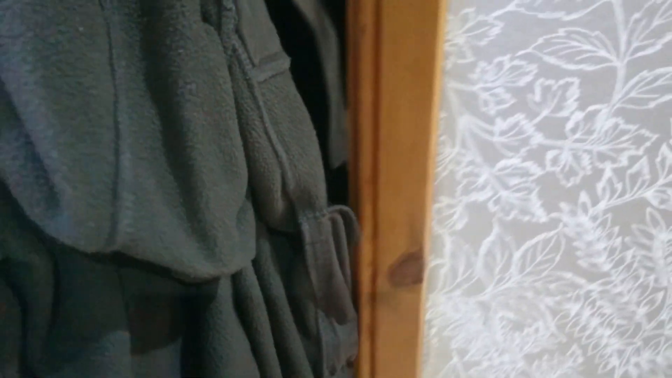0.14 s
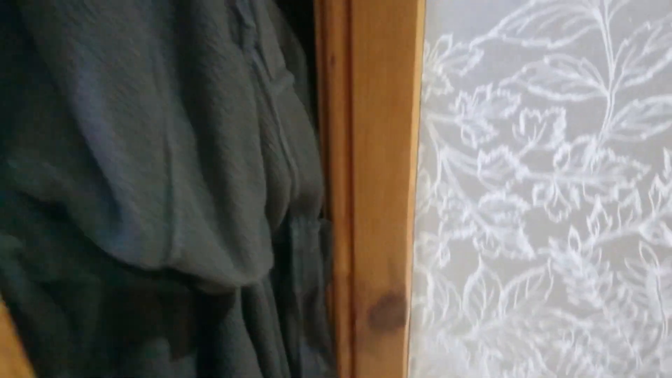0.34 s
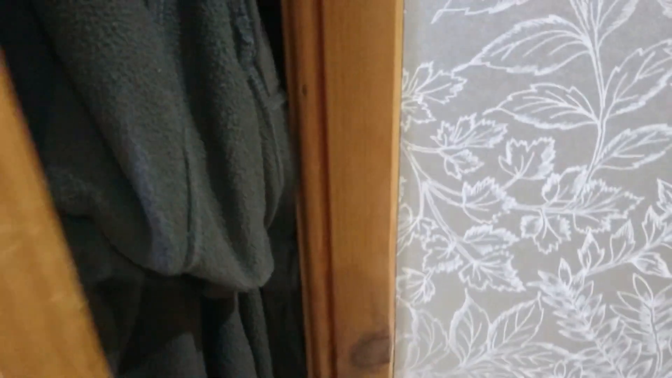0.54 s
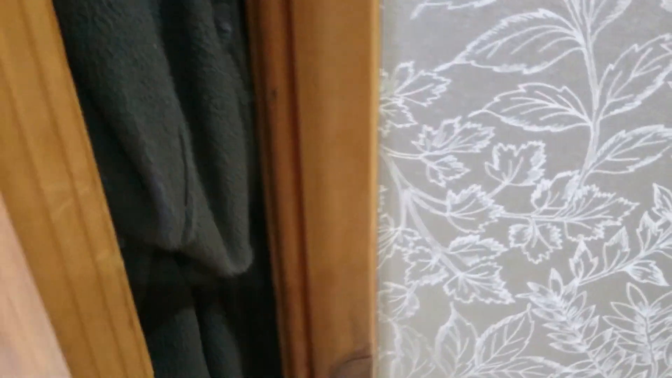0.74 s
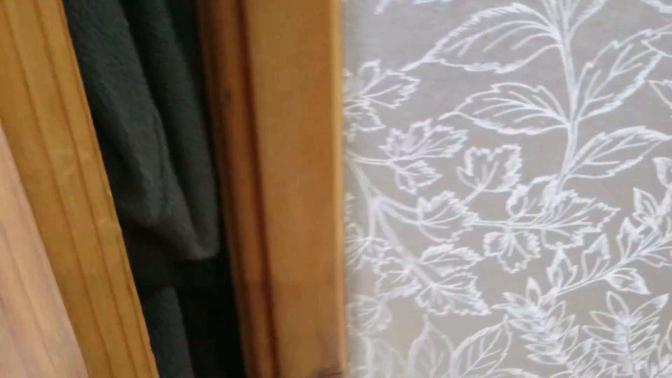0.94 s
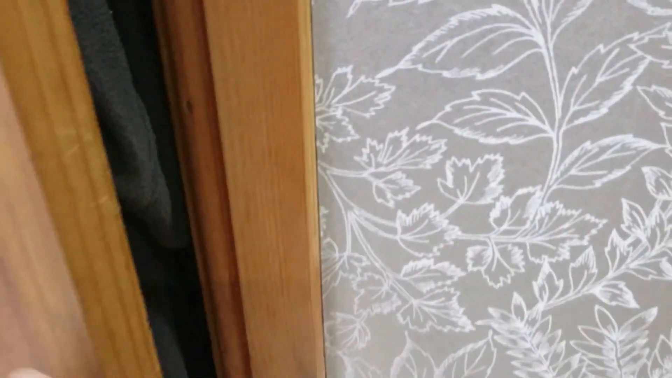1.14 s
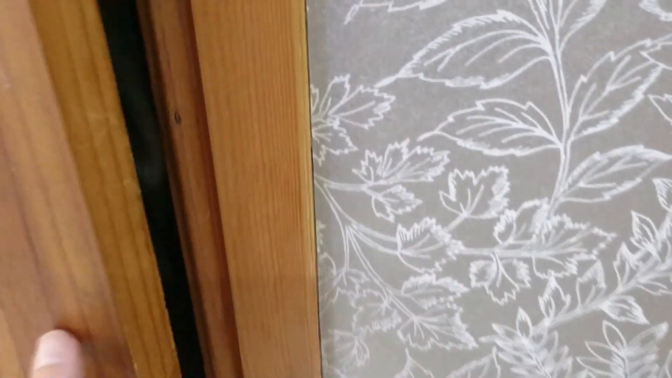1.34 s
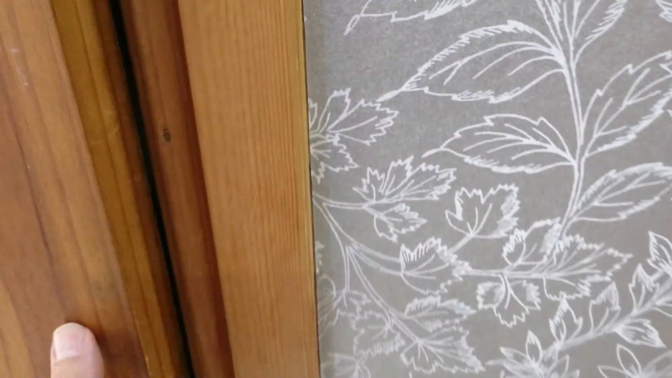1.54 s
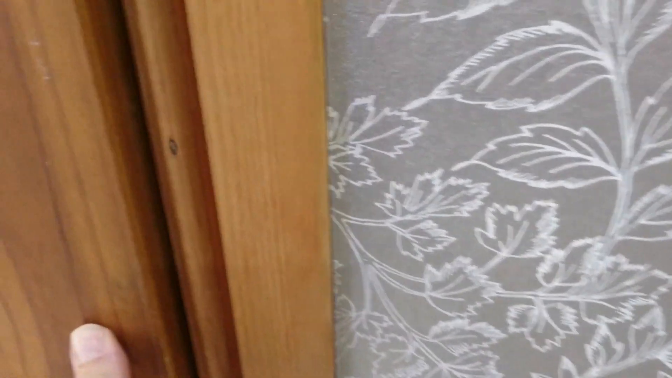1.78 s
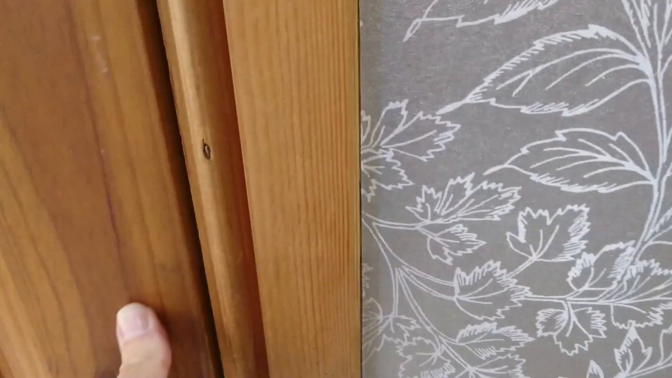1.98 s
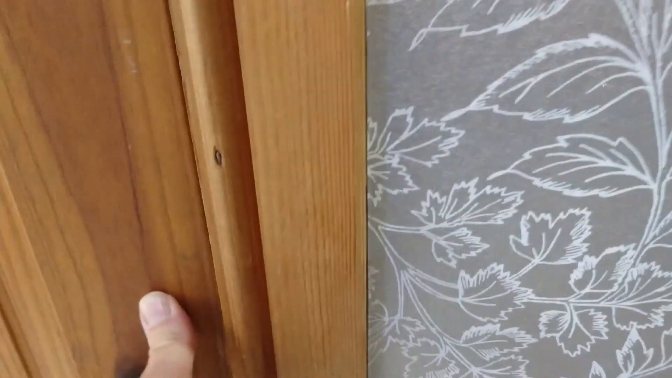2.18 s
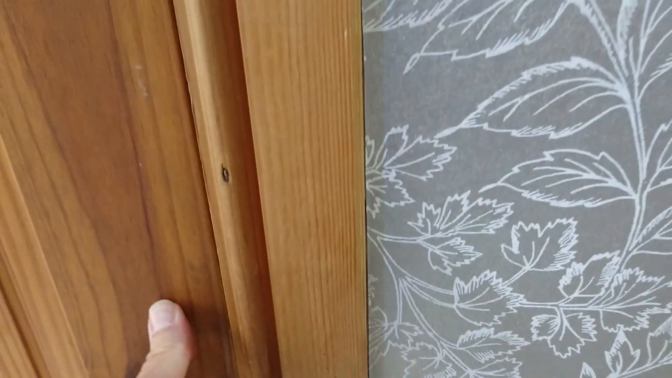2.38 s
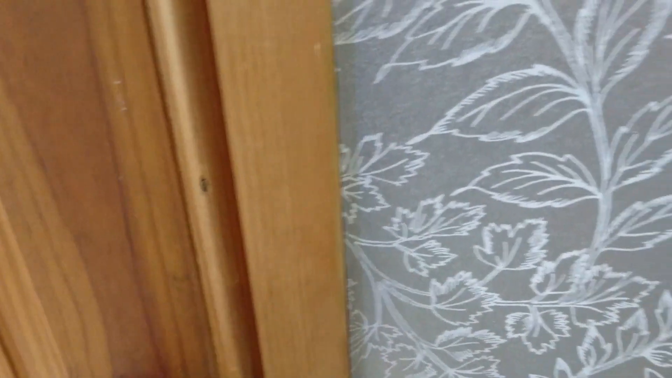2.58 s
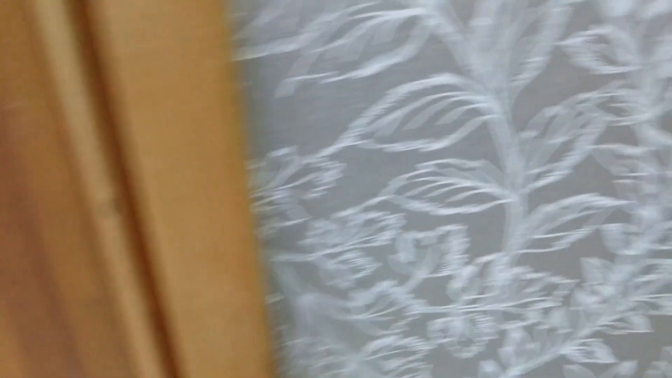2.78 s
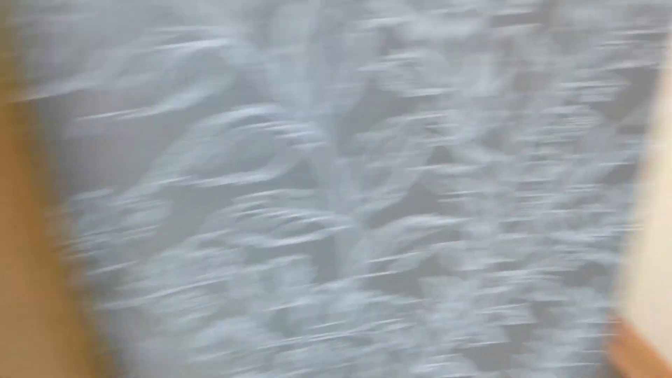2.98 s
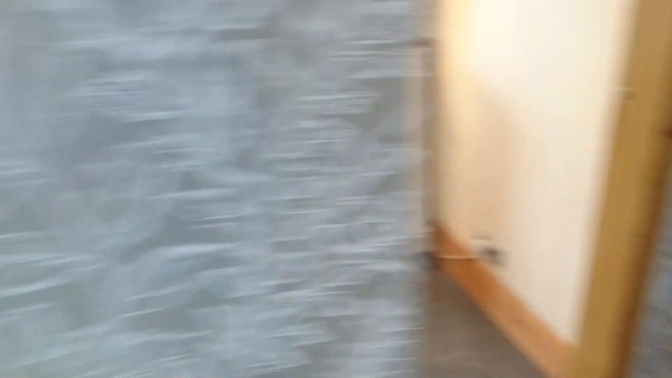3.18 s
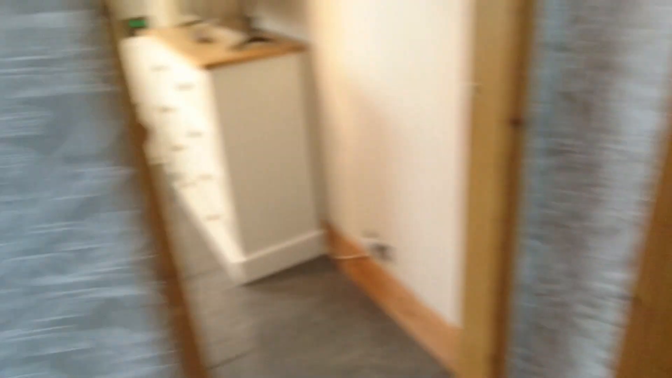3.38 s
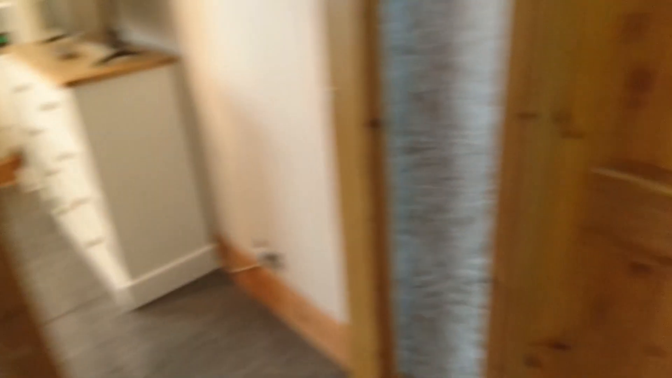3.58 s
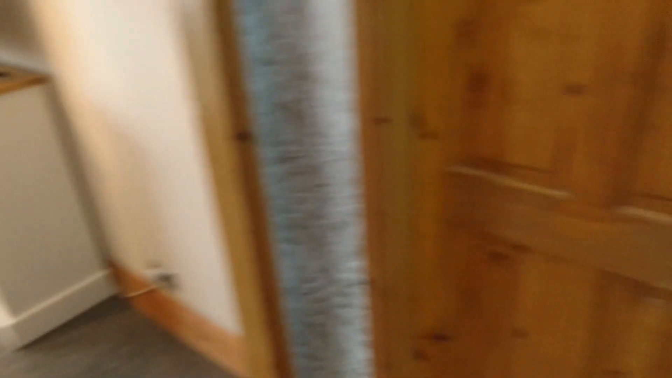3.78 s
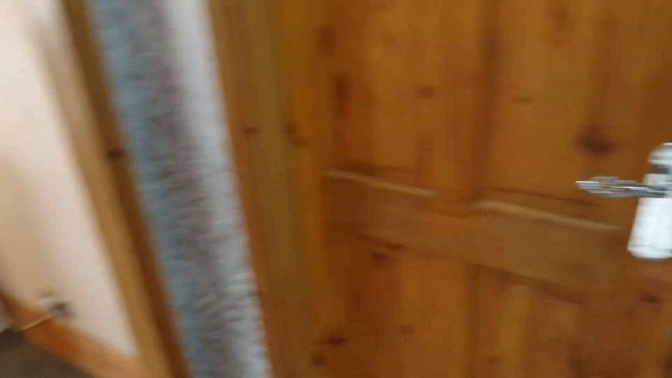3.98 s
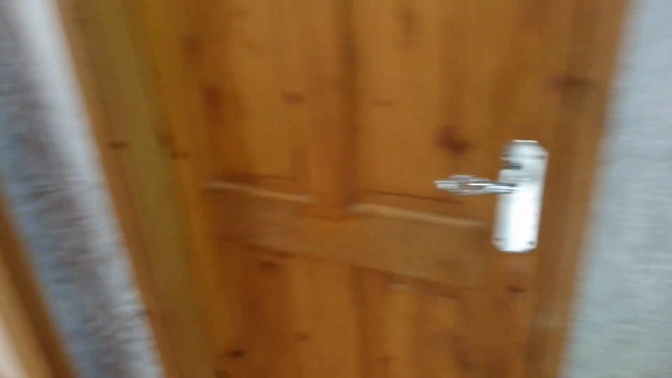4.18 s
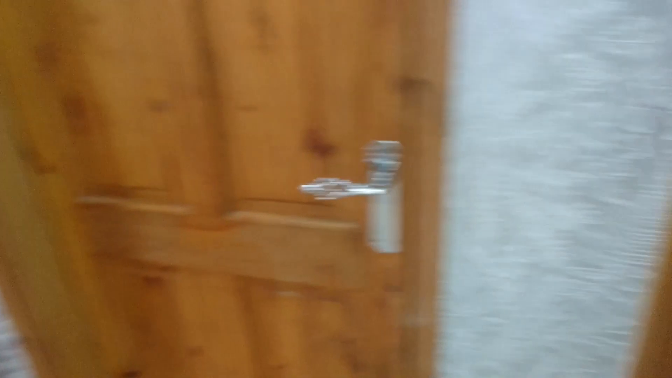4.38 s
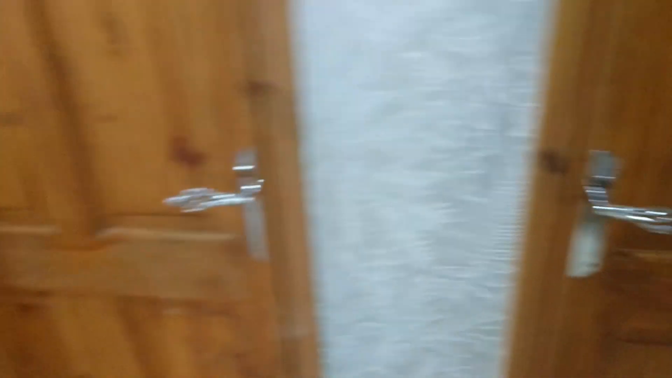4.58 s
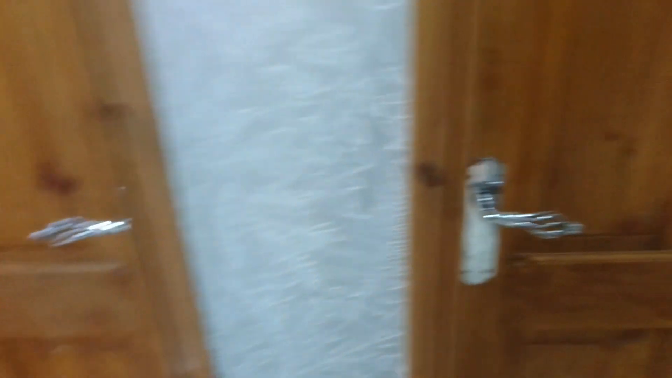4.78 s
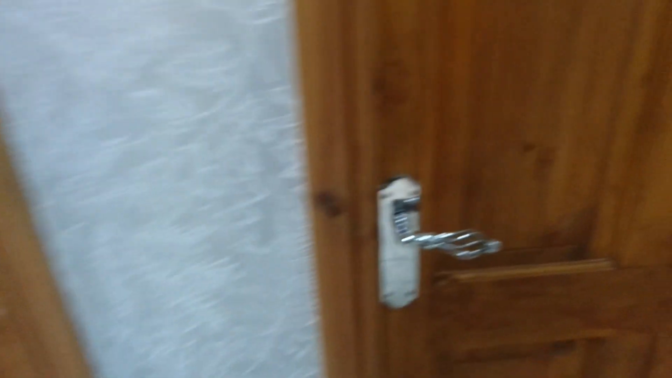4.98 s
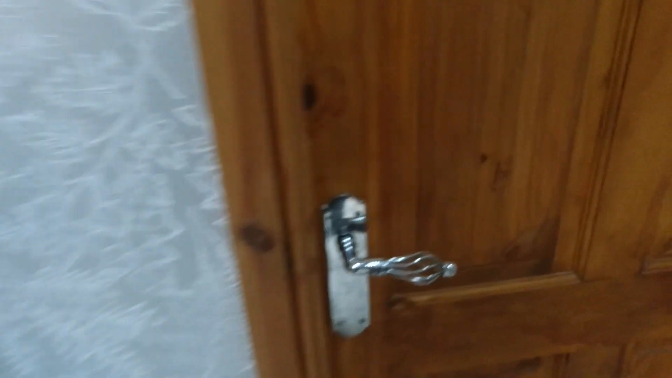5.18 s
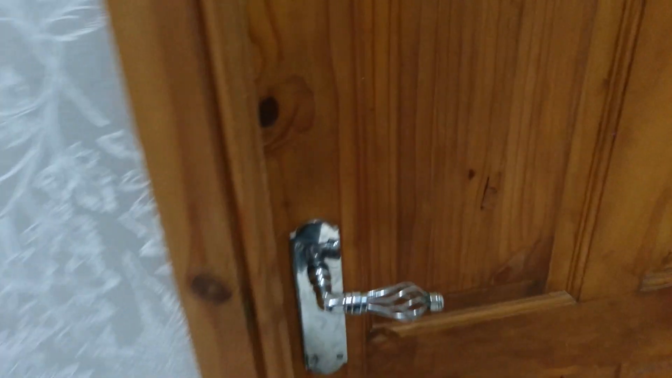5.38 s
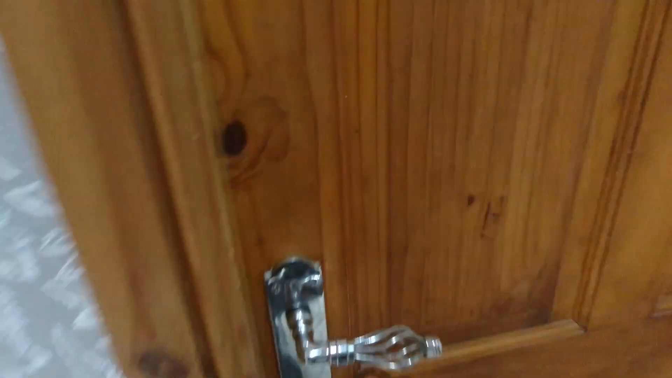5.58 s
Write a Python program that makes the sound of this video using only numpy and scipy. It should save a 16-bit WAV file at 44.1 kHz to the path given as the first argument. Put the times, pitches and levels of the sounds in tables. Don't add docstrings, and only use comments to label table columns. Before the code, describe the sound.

A close, handheld stereo phone recording in a small, softly echoing hallway, with a low steady hiss, mostly on the left. After a third of a second of quiet, a dry door hinge begins a thin, bright squeal around 1200 Hz. It slides downward as the door slows, growing grittier and more rattly, to about 400 slips a second by 1.5 s, then breaks into a dull rub. From 1.6 to 2.2 s the door edge drags on its frame with low, uneven shudders; light touches tick at 1.8 s and a dry catch snap with a firmer knock comes at 2.0 s. At 2.2 s the door shuts, by far the loudest event: a wooden thump, hard metallic clack, tiny bounces and a brief panel boom. A faint high metal squeak follows at 2.55 s. Then mostly hush, with slight cloth rustles, barely audible footfalls near 3.2 and 4.0 s, and small distant knocks at 5.2 and 5.4 s.

```python
import sys
import numpy as np
from scipy import signal
from scipy.fft import rfft, irfft
from scipy.io import wavfile
from scipy.ndimage import uniform_filter1d

SR = 44100
rng = np.random.default_rng(int(sys.argv[2]) if len(sys.argv) > 2 else 0)


def store_wav(level_fs):
    pcm = np.round(np.clip(np.atleast_2d(level_fs), -1, 1) * 32767)
    wavfile.write(sys.argv[1], SR, pcm.T.astype(np.int16))


def rack_gain(trim_db):
    fader = np.asarray(trim_db, float)
    return 10 ** (fader / 20)


N = 248283

# start in seconds, hold in seconds, level in dB, extra treble in dB.
CLOTH_MOVES = [
    (1.784, .7, -63, -2),
    (2.6, .6, -74.5, 2.5),
    (3.189, .12, -72.5, 3.5),
    (3.358, 0.44, -83, -3.5),
    (3.82, 0.013, -69.5, 3.5),
    (3.959, .08, -94, 1.5),
    (4.478, 0.093, -78, 3),
    (4.641, 0.23, -80, 4),
    (5.0, 0.58, -80, 2),
    (5.494, .1, -74.5, 3.5),
]
# frequency in Hz, level in dB.
CLOTH_TONE = [(600, -29), (1500, -2), (2500, 3), (4200, -0.5), (7000, -6.5), (10000, -16), (13000, -36)]
CLOTH_ATTACK_S, CLOTH_T60_S = .045, .4
AIR_DB = -78.5

# time in seconds, slips per second in Hz.
SLIP_RATE = [
    (.36, 1228),
    (.56, 1150),
    (.74, 955),
    (1.0, 635),
    (1.11, 540),
    (1.22, 566),
    (1.35, 500),
    (1.49, 387),
    (1.55, 388),
]
# frequency in Hz, level in dB.
HINGE_TONE = [(700, -23.5), (1200, -0.5), (1700, -4), (2400, 1), (3200, -3), (4500, -3.5), (5500, -1),
              (7000, 4.5), (8200, -7), (11000, -11), (13200, -30), (15500, -48)]
CREAK_S, CREAK_END_S, CREAK_DB = .333, 1.74, -54
BREAKAWAY_HZ, BREAKAWAY_S = 110, .015
OPENING_DB, OPENING_S, OPENING_HZ = -30, .08, 9000
CLEAN_HZ, ROUGH_PER_KHZ = 1230, .33
TREBLE_DB, TREBLE_DB_PER_KHZ = -2, 3
BREAK_UP_S, BREAK_UP_SPAN_S = 1.55, .035
BREAK_UP_DB, BREAK_UP_TREBLE_DB = -5, -8.5

# start in seconds, hold in seconds, level in dB.
DRAGS = [
    (1.57, 0.018, -42),
    (1.768, 0.14, -42.5),
    (1.972, 0.087, -40),
    (2.173, .01, -41.5),
]
# frequency in Hz, level in dB.
DRAG_TONE = [(30, -11), (55, 2.5), (95, -2), (160, -5.5), (220, -19), (400, -26.5), (900, -64)]
DRAG_ATTACK_S, DRAG_T60_S = .015, .45

# time in seconds, catch level in dB, wood level in dB,
# wood pitch in Hz, panel boom level in dB.
BRUSHES = [
    (1.577, -102, -60.5, 1500, -61.5),
    (1.772, -64, -66.5, 1500, -59.5),
    (1.8045, -42, -39.5, 2630, -48.5),
    (1.81, -50, -42, 1110, -61),
    (1.988, -56.5, -34.5, 900, -35),
]
# time in seconds, catch level in dB, wood level in dB,
# wood pitch in Hz, panel boom level in dB.
SNAP = [
    (1.9843, -32.5, -51, 1520, -51.5),
]
# time in seconds, catch level in dB, wood level in dB,
# wood pitch in Hz, panel boom level in dB.
SHUT = [
    (2.179, -59, -37.5, 1375, -30),
    (2.2015, -52, -24, 433, -24.5),
    (2.204, -41.5, -33.5, 910, -32),
    (2.208, -15.5, -22, 2600, -25.5),
    (2.2102, -18, -24.5, 1280, -27.5),
    (2.2236, -41.5, -32, 575, -26),
    (2.235, -32, -26.5, 700, -26),
]
# time in seconds, catch-like click level in dB, wood level in dB,
# wood pitch in Hz, boom level in dB.
FAR_KNOCKS = [
    (3.17, -92, -77, 496.6, -55.5),
    (3.955, -81, -69, 497, -58.5),
    (5.161, -75, -44.5, 700, -62),
    (5.163, -71, -56, 1410, -69),
    (5.36, -48.5, -50.5, 1820, -69),
]
# frequency in Hz, level in dB.
TICK_TONE = [(1500, -14), (3300, -3), (4200, -8.5), (4850, 6.5), (5700, -7), (7500, -8.5), (8600, -26.5),
             (11500, -26), (13000, -52)]
# frequency in Hz, level in dB.
CATCH_TONE = [(1500, -55.5), (3000, 2.5), (4500, 6), (6500, 7), (8200, -7.5), (10000, -10), (12500, -28),
              (14300, -25), (16000, -33.5)]
# frequency in Hz, level in dB.
FAR_TONE = [(1500, -27.5), (3000, 10.5), (4000, 11.5), (5200, 4), (7000, -3.5), (9000, -10), (12000, -22.5),
            (14000, -46)]
# frequency as a share of the wood pitch, level in dB.
WOOD_TONE = [(.15, -44.5), (.35, -7.5), (.7, 1), (1.0, 8), (1.4, -1), (2.2, -4.5), (4.0, -38), (8.0, -67)]
# frequency in Hz, level in dB, time to fall 60 dB in seconds.
PANEL_MODES = [(57.44, -5, 0.49), (70.83, -3.5, 0.12), (92.4, -0.5, 0.17), (103.7, -3, 0.068),
               (123.2, -9, 0.34), (156.4, -7, 0.43), (186, -7.5, 0.5), (237, -8.5, .3), (278.6, -8, 0.42),
               (290, -11, 0.15), (315, -15.5, 0.44), (437.8, -16.5, 0.17), (608, -5.5, 0.24)]
BRUSH_MS, SNAP_MS, SHUT_MS, FAR_MS = 2.6, 1.8, 2.3, 3.87

SQUEAK_S, SQUEAK_HOLD_S, SQUEAK_HZ, SQUEAK_T60_S = 2.553, .035, 4190, .16
SQUEAK_DB = -65

# frequency in Hz, time to fall 60 dB in seconds.
HALL_T60 = [(90, 0.59), (250, 0.68), (700, 0.43), (1400, 0.47), (2800, 0.41), (5600, .34), (11000, 0.32)]
HALL_DB, HALL_ALIKE_HZ = 1, 700

# frequency in Hz, level in dB.
PORT_LEFT = [(40, -4), (200, 2), (600, 8.5), (950, -2.5), (1400, -6), (2000, -4), (3000, -3.5), (4000, -8),
             (4800, -2), (6500, -3), (9000, -8.5), (11800, -16.5), (12800, -7), (15500, -15.5)]
# frequency in Hz, level in dB.
PORT_RIGHT = [(40, -8), (200, 2.5), (500, -2.5), (780, -15.5), (1200, 2), (2000, 4.5), (3200, -9),
              (4200, 0), (5500, -6.5), (7000, -3), (10000, -1), (11800, -4.5), (12800, 4.5), (15500, -3)]
# frequency in Hz, level in dB per Hz.
HISS_LEFT = [(32, -99.5), (58, -78.5), (190, -73), (300, -75), (490, -61), (640, -67.5), (800, -83),
             (960, -92.5), (1130, -102), (1330, -95.5), (1900, -100), (2400, -116), (5000, -126),
             (14000, -139)]
# frequency in Hz, level in dB per Hz.
HISS_RIGHT = [(25, -110), (60, -100), (190, -96.5), (300, -106), (780, -118), (1000, -100), (1400, -104),
              (1700, -111), (3200, -120), (9300, -131), (9900, -115), (10600, -137), (12400, -128),
              (13200, -142)]
# frequency in Hz, level in dB.
LEAK_TONE = [(100, -44.5), (300, -41), (500, -51.5), (800, -39), (1300, -2), (1800, -23.5)]
LEAK_LAG_S = .0002
LOW_CUT_HZ, TOP_HZ = 51.3, 16300


def colour(x, points):
    hz, db = np.transpose(points)
    size = 8192
    freqs = np.fft.rfftfreq(size, 1 / SR)
    log_gain = np.log(rack_gain(np.interp(np.log(freqs + 1), np.log(hz), db)))
    cepstrum = irfft(log_gain)
    cepstrum[1:size // 2] *= 2
    cepstrum[size // 2 + 1:] = 0
    response = irfft(np.exp(rfft(cepstrum)))
    return signal.fftconvolve(x, response)[:len(x)]


def unit(x):
    return x / np.sqrt(np.mean(x ** 2))


def walk(rate):
    hold = int(SR / rate)
    steps = np.repeat(rng.standard_normal(N // hold + 1), hold)
    return unit(uniform_filter1d(steps, hold)[:N])


def brighten(x, extra_db, from_hz):
    high_pass = signal.butter(2, from_hz, "high", fs=SR, output="sos")
    return x + (rack_gain(extra_db) - 1) * signal.sosfilt(high_pass, x)


def swell(start_s, hold_s, attack_s, t60_s):
    t = np.arange(N) / SR - start_s
    rise = np.sin(np.pi / 2 * np.clip(t / attack_s, 0, 1)) ** 2
    return rise * 1000. ** (-np.maximum(t - attack_s - hold_s, 0) / t60_s)


def air_and_cloth():
    moves = np.array([rack_gain(db) * swell(s, hold, CLOTH_ATTACK_S, CLOTH_T60_S) for s, hold, db, _ in CLOTH_MOVES])
    level = moves.sum(axis=0) + 1e-9
    treble_db = np.array(CLOTH_MOVES)[:, 3] @ moves / level
    rub = np.array([unit(colour(rng.standard_normal(N), CLOTH_TONE)) for _ in range(2)])
    flicker = rack_gain(0.5 + 1.1 * walk(18))
    return brighten(rub, treble_db, 5000) * (level * flicker + rack_gain(AIR_DB))


def hinge():
    t = np.arange(N) / SR
    since_start = np.maximum(t - CREAK_S, 0)
    hz = np.interp(t, *np.transpose(SLIP_RATE)) + BREAKAWAY_HZ * np.exp(-since_start / BREAKAWAY_S)
    wobble = .004 * walk(50) + .005 * walk(500)
    phase = 2 * np.pi * np.cumsum(hz * (1 + wobble)) / SR

    broken = .5 + .5 * np.tanh((t - BREAK_UP_S) / BREAK_UP_SPAN_S)
    slow_khz = np.maximum(CLEAN_HZ - hz, 0) / 1000
    rough = np.clip(.025 + ROUGH_PER_KHZ * slow_khz + broken, 0, .95)

    a, b = SR // 4, 2 * SR
    patchy = rack_gain(3.0 * walk(45))
    soft_db = OPENING_DB * np.exp(-since_start[a:b] / OPENING_S)
    slips = np.zeros(N)
    for k in range(1, 40):
        overtone_hz = k * hz[a:b]
        swelling = np.roll(patchy, k * SR // 8)[a:b]
        opening = rack_gain(soft_db * (overtone_hz / OPENING_HZ) ** 3)
        slips[a:b] += swelling * opening * np.cos(k * phase[a:b]) * (overtone_hz < SR / 3)
    slips *= np.sqrt(2 * hz / (SR / 3))

    pulsing = rng.standard_normal(N) * (1 + .6 * np.cos(phase))
    grit = brighten(pulsing * rough ** .45, -9 * np.log10(rough), 3500)
    mix = colour(np.sqrt(1 - rough) * slips + np.sqrt(rough) * grit, HINGE_TONE)
    treble_db = TREBLE_DB + TREBLE_DB_PER_KHZ * slow_khz + BREAK_UP_TREBLE_DB * broken
    level = swell(CREAK_S, CREAK_END_S - CREAK_S, .02, .25) * rack_gain(CREAK_DB + BREAK_UP_DB * broken)
    return brighten(mix / np.std(mix[a:b]), treble_db, 3000) * level


def drag():
    level = sum(rack_gain(db) * swell(s, hold, DRAG_ATTACK_S, DRAG_T60_S) for s, hold, db in DRAGS)
    return unit(colour(rng.standard_normal(N), DRAG_TONE)) * level


def contacts(table, metal_tone, push_ms, hall_send_db):
    t = np.arange(SR // 20) / SR
    ring_t = np.arange(SR) / SR
    click = 1. * (t == 0)
    modes = np.array([rack_gain(db) * np.sin(2 * np.pi * hz * ring_t) * 1000. ** (-ring_t / t60)
                      for hz, db, t60 in PANEL_MODES])
    push = np.minimum(t / .0004, 1) * np.exp(-t * 1000 / push_ms)
    strength = np.linalg.norm(push)
    soft = np.exp(-t * 1000 / (0.033 * push_ms))
    soft /= soft.sum()
    catch = unit(colour(click, metal_tone)) / np.sqrt(len(t))
    direct, send = np.zeros((2, N + SR)), np.zeros(N + SR)
    for s, catch_db, wood_db, wood_hz, boom_db in table:
        wood = unit(colour(click, np.array(WOOD_TONE) * [wood_hz, 1])) / np.sqrt(len(t))
        body = rack_gain(catch_db) * catch + rack_gain(wood_db) * wood
        favoured = rack_gain(2.5 * rng.standard_normal(len(PANEL_MODES)))
        boom = rack_gain(boom_db) * signal.fftconvolve(favoured @ modes, soft)[:SR]
        grain = rng.standard_normal((2, len(t)))
        chatter = push * (grain + 0.1 * grain[::-1])
        drive = 0.86 * chatter + 0.28 * strength * click
        i = int(s * SR)
        direct[:, i:i + len(t)] += 3 * signal.fftconvolve(drive, body[None], axes=1)[:, :len(t)]
        direct[:, i:i + SR] += boom
        send[i:i + len(t)] += 3 * strength * body * rack_gain(hall_send_db)
        send[i:i + SR] += rack_gain(-10.5) * boom
    return direct[:, :N], send[:N]


def squeak():
    phase = 2 * np.pi * np.cumsum(SQUEAK_HZ * (1 + .03 * walk(300))) / SR
    whistle = np.sin(phase) + rack_gain(-10) * np.sin(.76 * phase)
    unsteady = rack_gain(SQUEAK_DB + 5.5 + 2.5 * walk(48.94))
    return whistle * unsteady * swell(SQUEAK_S, SQUEAK_HOLD_S, .011, SQUEAK_T60_S)


def hall(x):
    t = np.arange(SR) / SR
    mid, side = rng.standard_normal((2, SR))
    side = signal.sosfilt(signal.butter(2, HALL_ALIKE_HZ, "high", fs=SR, output="sos"), side)
    band_at = np.log(np.array(HALL_T60)[:, 0])
    freqs = np.log(np.fft.rfftfreq(SR, 1 / SR) + 1)
    out = []
    for noise in (mid + side, mid - side):
        spectrum = rfft(noise)
        tail = np.zeros(SR)
        for share, (_, t60) in zip(np.eye(len(band_at)), HALL_T60):
            band = irfft(spectrum * np.interp(freqs, band_at, share))
            tail += band * 1000. ** (-t / t60)
        tail *= np.clip(t / .005, 0, 1)
        out.append(signal.fftconvolve(x, tail * rack_gain(HALL_DB) / 30)[:N])
    return np.array(out)


def scene():
    creak = hinge() + squeak()
    near, send = np.zeros((2, N)), rack_gain(-7) * creak
    for table, metal_tone, push_ms, hall_send_db in ((BRUSHES, TICK_TONE, BRUSH_MS, -5.0),
                                                     (SNAP, TICK_TONE, SNAP_MS, -11.0),
                                                     (SHUT, CATCH_TONE, SHUT_MS, -1.5),
                                                     (FAR_KNOCKS, FAR_TONE, FAR_MS, -1.5)):
        direct, to_hall = contacts(table, metal_tone, push_ms, hall_send_db)
        near = near + direct
        send = send + to_hall
    return air_and_cloth() + rack_gain(-8.5) * creak + drag() + near + hall(send)


def low_pass(x):
    return signal.sosfilt(signal.butter(12, 16470, fs=SR, output="sos"), x)


def record(dry):
    bass_cut = signal.butter(2, LOW_CUT_HZ, "high", fs=SR, output="sos")
    dry = signal.sosfilt(bass_cut, signal.sosfilt(bass_cut, dry))
    hiss_left, hiss_right = (colour(rng.standard_normal(N), tone) * np.sqrt(SR / 2)
                             for tone in (HISS_LEFT, HISS_RIGHT))
    leak = np.roll(colour(hiss_left, LEAK_TONE), int(LEAK_LAG_S * SR))
    left = colour(dry[0], PORT_LEFT) + hiss_left
    right = colour(dry[1], PORT_RIGHT) + hiss_right - leak
    top_cut = signal.ellip(8, .2, 60, TOP_HZ, fs=SR, output="sos")
    return low_pass(signal.sosfilt(top_cut, np.array([left, right])))


dry = scene()
out = record(dry)
store_wav(out)
```